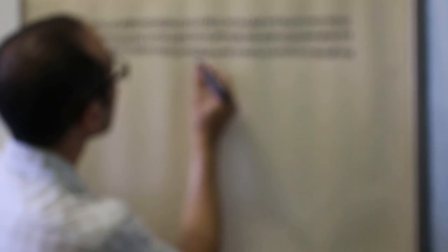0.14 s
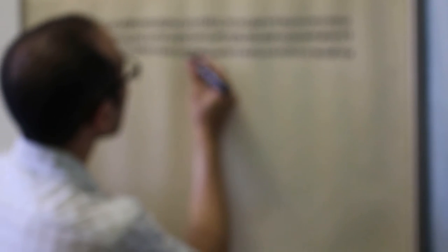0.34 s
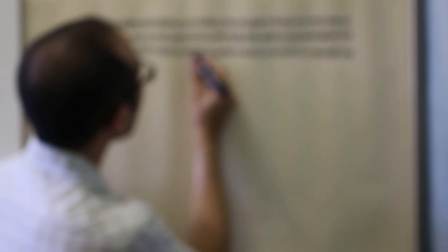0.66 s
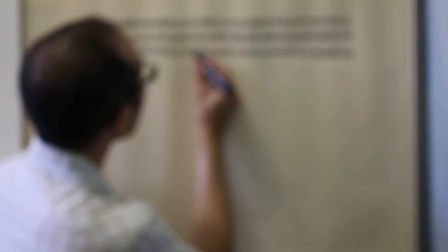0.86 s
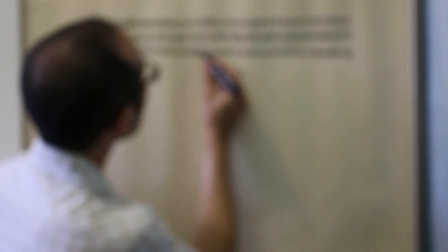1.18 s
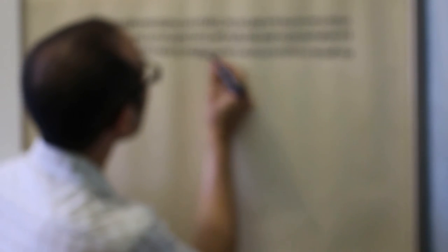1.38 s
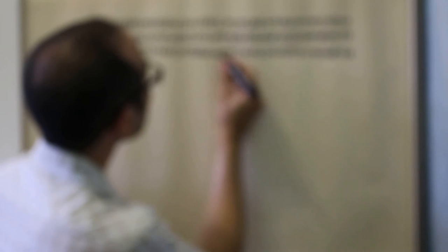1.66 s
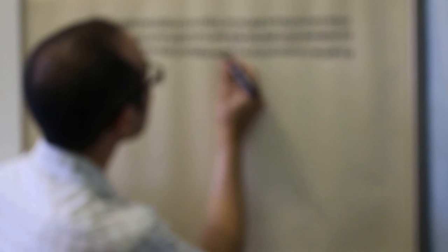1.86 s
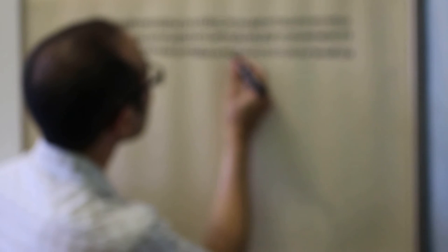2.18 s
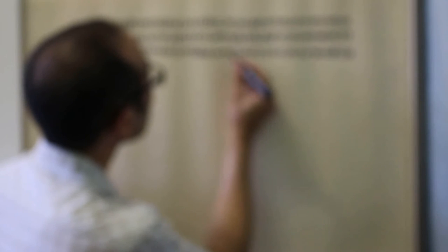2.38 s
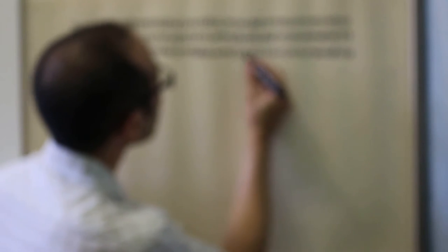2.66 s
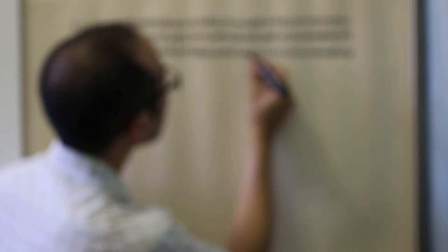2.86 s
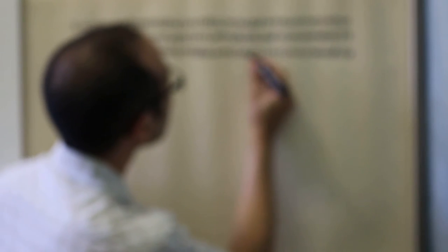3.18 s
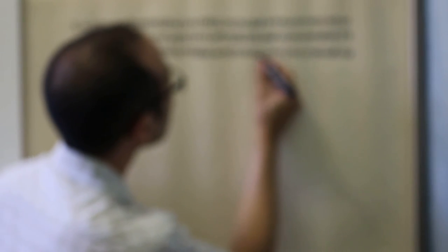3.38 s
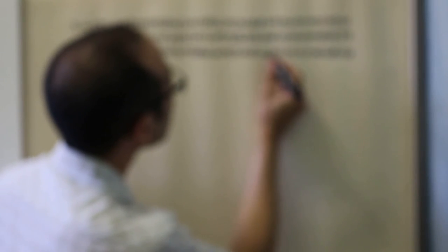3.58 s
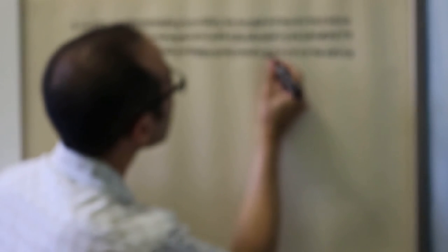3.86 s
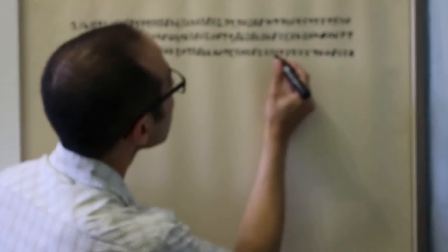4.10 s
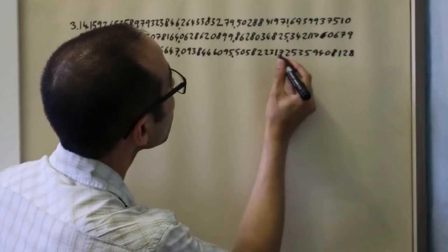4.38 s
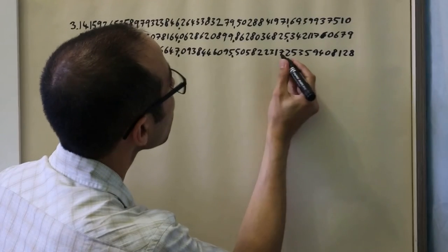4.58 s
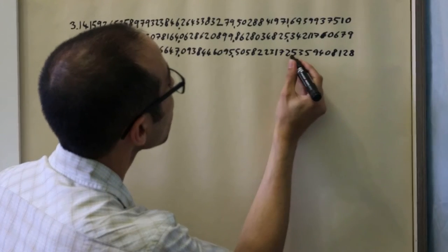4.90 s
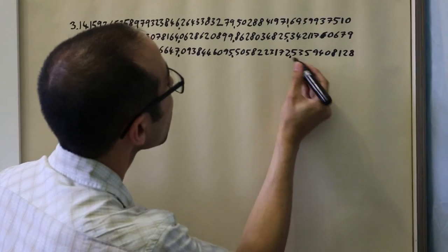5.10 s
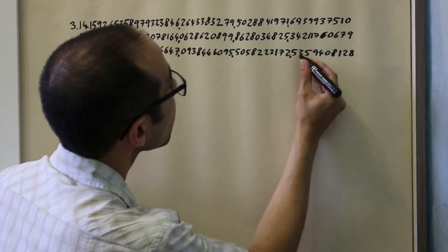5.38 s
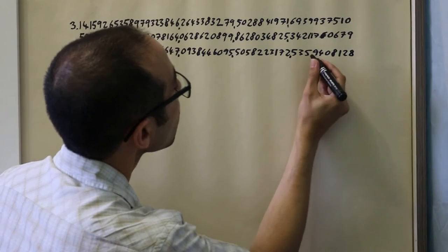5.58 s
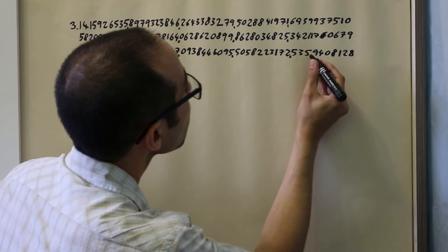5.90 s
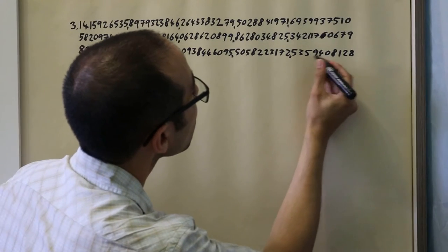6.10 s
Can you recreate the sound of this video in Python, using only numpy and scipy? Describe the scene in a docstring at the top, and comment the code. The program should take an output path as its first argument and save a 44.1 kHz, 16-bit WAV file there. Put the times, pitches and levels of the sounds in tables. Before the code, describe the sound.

Close, irregular marker strokes hiss and scratch on a loose wall panel, each touch a click with a soft hollow thump, indoors.

```python
"""In a quiet room, a felt-tip marker writes digits on a large wall board.
Touches and soft knocks ring the pen's barrel and send a dispersive bending wave through the panel:
a tick, then a low thud; the loose panel knocks back on its frame and swings slowly.
Friction noise makes the felt hiss and sometimes rasp along each stroke, and the hand and sleeve rub;
filtered noise and a few wavering tones make the ventilation's rumble."""
import sys
import numpy as np
from scipy import signal
from scipy.fft import rfft, irfft, next_fast_len
from scipy.io import wavfile

SR = 44100
rng = np.random.default_rng(int(sys.argv[2]) if len(sys.argv) > 2 else 0)


def unload_audio(sound):
    """Save the sound as a 16-bit wav file, at the path given as the first command line argument."""
    columns = np.transpose(np.atleast_2d(sound))
    # keep every value between -1 and 1, then stretch to whole-number steps
    steps = np.round(np.clip(columns, -1, 1) * 32767)
    wavfile.write(sys.argv[1], SR, steps.astype(np.int16))


N = 275163

# Touches and soft knocks on the panel, faint to firm: (time [s], relative barrel click [dB],
# relative hard clack [dB], relative thud [dB], knock-back relative to the thud [dB])
TOUCHES = [(0.0235, -37, -49.5, -20.5, -20), (0.2436, -34.5, -39.5, -18, -19), (0.297, -52, -46, -35, -11),
           (0.5058, -35, -55, -14.5, -13), (0.7572, -41, -51, -23.5, -25), (0.9391, -48, -50, -41, 6),
           (1.2596, -44, -44.5, -20, -4.5), (1.6532, -58, -53, -30, -9), (1.911, -38.5, -48, -21, 0),
           (2.14, -56, -45, -20, -30), (2.352, -31, -64, -16, -2.5), (2.4545, -47, -62, -30, -17),
           (2.5, -23.5, -23, -10, -15), (2.5275, -27.5, -32, -11.5, -20), (2.5537, -37, -38.5, -45, -16),
           (2.5682, -50, -59, -13.5, -6.5), (2.7006, -39, -51, -29, -17), (2.797, -43, -46, -23.5, -14),
           (3.0456, -32, -47, -17, -22), (3.311, -43, -33.5, -16, -22), (3.4223, -62, -68, -26, -17),
           (3.5296, -32, -43, -19, -13), (3.5863, -34, -47, -22, -18), (3.7058, -64, -54, -47, -12),
           (3.9699, -38.5, -41, -22, -30), (4.144, -53, -48, -27, -21), (4.3584, -38, -44.5, -26.5, -16),
           (5.0359, -30, -38, -15, -4), (5.2004, -25, -22.5, -10.5, -11), (5.24, -42, -29, -11.5, -23),
           (5.2526, -35, -39, -26, -11), (5.6352, -61, -73, -30.5, -25), (5.7941, -38.5, -42.5, -26, -12),
           (5.819, -33, -46, -27.5, -11), (5.8421, -47, -49, -22, -21), (5.9487, -49, -47, -29.5, -18),
           (6.0307, -44, -46, -27, -12), (6.2014, -21, -23, -11.5, -13), (6.231, -55, -55, -14, -15)]
BEND_DELAY_S = 0.01205   # travel time of a 100 Hz bending wave
RING_SIZE = 2 ** 15   # longest single event [samples]


def from_db(db):
    """Amplitude gain is ten to the power of the level over 20."""
    return 10 ** (np.asarray(db) / 20)


def rms_one(x):
    """Normalise to unit mean-square power."""
    return x / np.sqrt(np.mean(x ** 2) + 1e-20)


def in_time(rows):
    """Interpolate each column linearly in time, sample by sample."""
    s, *columns = np.transpose(rows)
    return [np.interp(np.arange(N) / SR, s, column) for column in columns]


def at_hz(points, hz):
    """Interpolate a table on a logarithmic frequency axis."""
    known_hz, values = np.transpose(points)
    return np.interp(np.log(np.maximum(hz, 1)), np.log(known_hz), values)


def coloured(x, spectrum):
    """Spectral shaping: multiply the spectrum by a gain curve, then normalise to unit power."""
    size = next_fast_len(len(x))
    hz = np.arange(size // 2 + 1) * SR / size
    shaped = rfft(x, size) * from_db(at_hz(spectrum, hz))
    return rms_one(irfft(shaped, size)[:len(x)])


def drift(rate, size=N):
    """Slow random modulation: straight lines join normal random values, `rate` of them a second."""
    knots = rng.standard_normal(size // 8)
    return np.interp(np.arange(size) / SR * rate, np.arange(len(knots)), knots)


def add(track, sound, s):
    """Superposition: mix a sound into the track from time s."""
    at = int(np.clip(round(s * SR), 0, N - 1))
    track[at:at + len(sound)] += sound[:N - at]


def slips(spectrum, grain_db, flutter_db, flutter_rate, size=N):
    """Stick-slip friction: countless tiny catches and slips, fluttering with the pressure; unit power."""
    grain = grain_db * drift(2500, size)
    flutter = flutter_db * drift(flutter_rate, size)
    return coloured(rng.standard_normal(size) * from_db(grain + flutter), spectrum)


def swells(rows):
    """Friction follows sliding speed: each short slide speeds up and slows down again."""
    out = np.zeros(N)
    for s, length, db in rows:
        add(out, from_db(db) * signal.windows.tukey(int(length * SR), .8), s)
    return out


def ventilation(air_db):
    """Broadband flow noise: a steady rush of air with a few randomly modulated tones."""
    # Air colour: (frequency [Hz], relative spectral level [dB])
    air_colour = [(10, -19), (22, 1), (40, -11), (58, 0), (98, -9.5), (171, -8), (300, -24), (534, -29),
                  (800, -28), (1340, -34), (2500, -38), (9000, -38.5), (13000, -40), (15700, -41)]
    # Tones: (frequency [Hz], width [Hz], level [dB])
    tones = [(49.4, 2.31, -39.5), (348, 12, -56), (374.5, 4.1, -63), (648, 8.5, -63.5), (720, 4.6, -69)]
    t = np.arange(N) / SR
    out = from_db(air_db) * coloured(rng.standard_normal(N), air_colour)
    for hz, width, db in tones:
        # complex modulation wavers both strength and phase
        waver = 1 + (drift(2 * width) + 1j * drift(2 * width)) / 2
        out += from_db(db) * rms_one(np.real(waver * np.exp(2j * np.pi * hz * t)))
    return out


def hand(rub_db, sleeve_db, skid_db):
    """Sliding friction: skin drags unevenly over the panel and now and then skids; the sleeve follows."""
    # Arm moving along the panel: (time [s], relative hand rub [dB], relative sleeve rustle [dB])
    arm_levels = [(0.0, -49.5, -54.5), (0.4, -52, -53), (0.64, -51, -58.5), (0.94, -54, -56),
                  (1.34, -53.5, -55.5), (1.75, -53.5, -57), (2.38, -52.5, -54.5), (2.59, -51, -57.5),
                  (2.88, -51.5, -56.5), (3.35, -57, -62), (3.93, -52, -57.5), (4.38, -60, -62),
                  (5.07, -55, -62), (5.21, -54.5, -56), (5.53, -51, -54.5), (6.24, -52, -53)]
    # Side of the hand skidding to a new place: (time [s], length [s], relative level [dB],
    # pitch relative to the skid colour [ratio])
    skid_events = [(0.168, 0.14, -38.5, 1.06), (0.659, 0.12, -44.5, 1.06), (2.139, 0.076, -42, 1.0),
                   (2.938, 0.051, -46, 1.1), (3.579, 0.15, -44, 0.91)]
    # Colours of rub, skid and sleeve: (frequency [Hz], relative spectral level [dB])
    rub_colour = [(60, 13.5), (130, 10), (250, 4), (430, 4.5), (550, 0.5), (670, -2), (800, -3),
                  (1200, -8.5), (2500, -17.5), (9000, -60)]
    skid_colour = [(150, -26), (300, -0.5), (380, 6), (500, -3.5), (620, -13.5), (1000, -23), (2000, -56)]
    sleeve_colour = [(400, -39), (1200, -2.5), (2000, 0), (3200, -3), (5000, -11), (9000, -3), (15500, -17)]
    # level changes are stretched about the reference, so rubbing falls away faster as the arm comes to rest
    reference_db, contrast = -52, 1.78
    rub, sleeve = [from_db(reference_db + contrast * (db - reference_db)) for db in in_time(arm_levels)]

    out = from_db(rub_db) * rub * slips(rub_colour, grain_db=0.5, flutter_db=3.0, flutter_rate=86)
    for s, length, db, pitch in skid_events:
        colour = [(hz * pitch, level) for hz, level in skid_colour]
        skid = slips(colour, grain_db=2.5, flutter_db=1.5, flutter_rate=140, size=RING_SIZE)
        add(out, swells([(0, length, db + skid_db)])[:RING_SIZE] * skid, s)
    rustle = slips(sleeve_colour, grain_db=3.0, flutter_db=1.5, flutter_rate=220)
    return out + from_db(sleeve_db) * sleeve * rustle


def bending_wave(spectrum):
    """Dispersion: bending waves travel as the root of frequency, so a tap is a falling chirp; peak 1."""
    hz = np.arange(RING_SIZE // 2 + 1) * SR / RING_SIZE
    # this phase delays each frequency by BEND_DELAY_S * sqrt(100 / hz)
    phase = 4 * np.pi * BEND_DELAY_S * np.sqrt(100 * hz)
    wave = irfft(from_db(at_hz(spectrum, hz)) * np.exp(-1j * phase))
    return wave / np.abs(wave).max() * (np.arange(RING_SIZE) < RING_SIZE // 8)


def ringing(modes, spread_db, count):
    """Modal decay: modes start as the bending wave reaches them, with strengths that vary by touch."""
    hz, db, t60 = np.transpose(modes)[:, :, None]
    arrival = BEND_DELAY_S * np.sqrt(100 / hz)
    age = np.maximum(np.arange(RING_SIZE) / SR - arrival, 0)
    strengths = from_db(spread_db * rng.standard_normal((count, len(modes))))
    return strengths @ (from_db(db - 60 * age / t60) * np.sin(2 * np.pi * hz * age))


def scatter(count, build_s):
    """Reverberation: frame and wall reflections, new for each touch, die band by band; unit energy."""
    # Decay of scattered waves in panel and room: (frequency [Hz], t60 [s])
    decay_times = [(40, 0.26), (130, 0.24), (350, .22), (800, 0.12), (2000, 0.095), (5000, .13)]
    t = np.arange(RING_SIZE // 2) / SR
    edges_hz = np.geomspace(25, 12800, 10)
    white, out = rng.standard_normal((count, len(t))), 0
    for low, high in zip(edges_hz, edges_hz[1:]):
        band_filter = signal.butter(2, [low, high], "band", fs=SR, output="sos")
        t60 = at_hz(decay_times, np.sqrt(low * high))
        out = out + signal.sosfilt(band_filter, white) * from_db(-60 * t / t60)
        white = white[:, ::-1]   # reversed noise for the next band
    out = out * (1 - np.exp(-t / build_s))
    return out / np.sqrt(np.sum(out ** 2, axis=1, keepdims=True))


def chatter(length_s, share):
    """Repeated impact: a first contact, then a decaying cluster of tiny ones; unit energy."""
    t = np.arange(RING_SIZE // 64) / SR
    contacts = rng.standard_normal(len(t)) * np.exp(-t / length_s)
    contacts *= share / np.linalg.norm(contacts)
    contacts[0] += 1
    return contacts / np.linalg.norm(contacts)


def taps(thud_db, clack_db, barrel_db, knock_db, thud_scatter_db, tick_scatter_db, knock_scatter_db, lead_s):
    """Impact excitation: each touch sends chirps, rings pen and panel, scatters, and is knocked back."""
    # Colours of thud, clack and mid-range knock: (frequency [Hz], relative spectral level [dB])
    thud_colour = [(18, -16), (45, -9), (72, -4), (110, 3), (170, -4), (250, -11.5), (380, -19),
                   (500, -25.5), (800, -38.5), (1300, -47), (2500, -89)]
    clack_colour = [(300, 1), (700, 2), (1100, 4.5), (1600, 1.5), (2400, 5), (3200, -7), (4100, -10),
                    (5000, -27), (8000, -39), (15000, -47)]
    knock_colour = [(120, -28), (240, 1), (340, 5.5), (460, -1), (620, -3), (900, -9), (1500, -40),
                    (4000, -62)]
    # Panel and pen barrel modes: (frequency [Hz], relative level [dB], t60 [s])
    panel_modes = [(48, -13.5, 0.31), (95.5, -13, 0.2), (135.1, -12, 0.3), (163, -27, 0.54),
                   (199.1, -26.5, 0.54), (247.5, -28.5, 0.42), (307.2, -25.5, 0.15), (364, -25.5, 0.17),
                   (481, -33, 0.15), (584, -42, 0.21)]
    barrel_modes = [(2470, -12, 0.022), (2784, 6, 0.0079), (2930, 2, 0.012), (3135, -4.5, 0.023),
                    (3710, -9.5, 0.021), (3840, -29, .016), (4580, -33, 0.014)]
    # A grazing touch: (relative barrel click [dB], relative hard clack [dB], relative thud [dB],
    # knock-back relative to the thud [dB])
    graze = (-62, -58, -37, -17)
    graze_count = 8   # faint extra touches at random times
    knock_back_s = .057   # the loose panel falls back on its frame this long after a touch

    touches = list(TOUCHES) + [(s, *graze) for s in rng.uniform(0, N / SR, graze_count)]
    count = len(touches)
    thud, clack, knock = bending_wave(thud_colour), bending_wave(clack_colour), bending_wave(knock_colour)
    panels = ringing(panel_modes, spread_db=4.0, count=count)
    barrels = ringing(barrel_modes, spread_db=1.5, count=count)
    tails = scatter(count, build_s=0.0031)
    out = np.zeros(N)
    for touch, panel, barrel, tail in zip(touches, panels, barrels, tails):
        s, pen_db, hard_db, push_db, back_db = touch
        start = s - lead_s
        push = from_db(push_db + thud_db)
        landing = signal.fftconvolve(clack, chatter(length_s=0.002, share=1.0))[:RING_SIZE]
        tick = from_db(hard_db + clack_db) * landing + from_db(pen_db + barrel_db) * barrel
        # a hard landing is brief, so it also wakes the panel's middle range
        middle = from_db(hard_db + knock_db) * knock
        scattered = from_db(thud_scatter_db) * push * thud
        scattered = scattered + from_db(tick_scatter_db) * tick
        scattered = scattered + from_db(knock_scatter_db) * middle
        # the panel is pushed away from the listener, so the pressure falls first
        body = -push * (thud + panel)
        add(out, body - middle - tick, start)
        add(out, from_db(back_db) * body, start + knock_back_s)
        add(out, signal.fftconvolve(scattered[:RING_SIZE // 8], tail), start)
    return out


def sway(sway_db):
    """Forced swing: each listed touch swells a low noise, louder after a heavy thud; powers add."""
    # Swing colour: (frequency [Hz], relative spectral level [dB])
    sway_colour = [(14, 8), (26, 18.5), (45, 18.5), (70, 8), (130, -37.5)]
    rise_s, decay_s = .03, .15
    follows = 0.61   # swing per thud level [dB per dB]
    t, power = np.arange(RING_SIZE) / SR, np.zeros(N)
    swing = (1 - np.exp(-t / rise_s)) * np.exp(-t / decay_s)
    for s, _, _, push_db, _ in TOUCHES:
        add(power, (from_db(follows * push_db + sway_db) * swing) ** 2, s)
    return np.sqrt(power) * coloured(rng.standard_normal(N), sway_colour)


def stroke_shape(length, swell_db):
    """Energy envelope: a stroke speeds up, swells or fades with pressure, stops, and lingers in the room."""
    attack_s, release_s = 0.028, 0.035   # the nib gathers speed, and slows to a stop
    linger_s, linger_share = 0.013, 0.083   # the room holds a share of the power for a moment
    t = np.arange(RING_SIZE // 2) / SR
    speed = np.clip(np.minimum(t / attack_s, (length - t) / release_s), 0, 1)
    pressure = from_db(swell_db * (np.minimum(t / length, 1) - .5))
    power = (np.sin(np.pi / 2 * speed) * pressure) ** 2
    hold = np.exp(-1 / (linger_s * SR))
    return np.sqrt(power + linger_share * signal.lfilter([1 - hold], [1, -hold], power))


def felt(nib_db, friction_db, rasp_db, flick_s):
    """Stick-slip friction: nib hiss over broad friction in each stroke, with dry rasps and quick flicks."""
    # Strokes: (time [s], length [s], relative nib hiss [dB], relative broad friction [dB],
    # swell from start to end [dB], brightness [dB per octave])
    strokes = [(0.044, .22, -52, -57.5, 3, 3), (0.24, 0.078, -47.5, -49, 1, -1),
               (0.288, 0.23, -55, -65, 5, -4), (0.444, 0.087, -46, -51, 8, -1),
               (0.507, 0.17, -55.5, -57, -2, 4), (0.787, 0.13, -59, -56.5, -1, 1),
               (0.865, 0.037, -47, -52, -3, 2), (1.09, .07, -47.5, -51, 1, -3),
               (1.135, 0.12, -39, -47.5, 5.5, 3), (1.376, 0.12, -46, -50.5, 5, 2),
               (1.593, 0.063, -38.5, -50, 8, 6), (1.644, .12, -42.5, -50, 0, 7),
               (1.901, 0.14, -52, -54.5, -8, -1), (2.005, 0.082, -44, -52.5, -1, 2),
               (2.066, 0.11, -43.5, -49.5, -3, -1), (2.34, 0.064, -39, -46, -2, -9),
               (2.396, .15, -39.5, -48.5, 10, 4), (2.527, 0.16, -47.5, -57, -18, -5),
               (2.649, 0.14, -44.5, -52.5, -4, -1), (2.794, 0.079, -43, -50.5, -3, 1),
               (3.227, .11, -37.5, -49, 8, -1), (3.363, 0.051, -45.5, -56, 10, -2),
               (3.526, 0.1, -44, -50, 7, -4), (3.965, 0.093, -46.5, -59, 3, -1),
               (4.003, 0.15, -42, -52, 0, 0), (4.405, 0.073, -50, -53, -5, -3),
               (4.638, .12, -38, -50, 3.5, -1.5), (4.786, .044, -44, -53.5, 5, 3),
               (5.02, 0.093, -44, -47, -5, -1), (5.105, .165, -42.5, -51.5, 6, -1),
               (5.242, 0.2, -41.5, -53, 1.5, 0), (5.51, 0.091, -41, -52, -2, 3),
               (5.683, 0.21, -53.5, -57, 8, 4), (5.854, 0.2, -54.5, -58.5, -10, 2),
               (6.069, .052, -41.5, -50, 1, 4), (6.099, .122, -37.5, -48.5, 16.5, 2)]
    # The nib drags dry and judders: (time [s], length [s], relative level [dB])
    rasp_events = [(1.1, 0.19, -61), (2.105, 0.065, -53), (2.338, 0.07, -42.5), (2.665, 0.14, -53),
                   (3.28, 0.058, -47), (5.04, 0.054, -45), (5.17, 0.047, -51)]
    # Sharp flicks as the felt catches: (time [s], relative level [dB])
    flick_events = [(.299, -38), (1.626, -49), (2.245, -51), (2.312, -45), (3.868, -49)]
    # Colours of nib, broad friction and rasp: (frequency [Hz], relative spectral level [dB])
    nib_colour = [(3000, -40), (5500, -13), (7000, -8), (8000, -5.5), (8900, -1), (9800, -1.5),
                  (10300, -2.5), (11000, -3), (11900, -8), (13000, -12.5), (15500, -20)]
    friction_colour = [(450, 14.5), (680, 8.5), (900, 5.5), (1300, 3.5), (2200, 7), (2700, 4.5), (3100, 6),
                       (4000, 1.5), (4400, 5), (4900, 1), (5800, 3), (7500, 4), (12500, -8.5),
                       (15500, -4.5)]
    rasp_colour = [(600, -3), (1200, -1), (1750, 11), (2300, -6), (2950, 4), (3500, -5), (4400, -28),
                   (9000, -32)]
    tilt_hz = 9500   # a stroke's brightness tilts the hiss above this frequency

    judder = slips(rasp_colour, grain_db=6.5, flutter_db=0.0, flutter_rate=430)
    out = from_db(rasp_db) * swells(rasp_events) * judder
    for s, length, hiss_db, broad_db, swell_db, bright_db in strokes:
        shape = stroke_shape(length, swell_db)
        size = len(shape)
        colour = [(hz, db + bright_db * max(np.log2(hz / tilt_hz), 0)) for hz, db in nib_colour]
        hiss = slips(colour, grain_db=1.2, flutter_db=1.1, flutter_rate=163, size=size)
        broad = slips(friction_colour, grain_db=2.5, flutter_db=1.2, flutter_rate=45.6, size=size)
        add(out, shape * (from_db(nib_db + hiss_db) * hiss + from_db(friction_db + broad_db) * broad), s)

    t, flicks = np.arange(N) / SR, np.zeros(N)
    for s, db in flick_events:
        flicks += from_db(db) * np.exp(-np.minimum(((t - s) / flick_s) ** 2, 20))
    nib_noise = coloured(rng.standard_normal(N), nib_colour)
    broad_noise = coloured(rng.standard_normal(N), friction_colour)
    return out + flicks * (nib_noise + broad_noise / 2)


def scene():
    """Linear superposition of writing sounds and ventilation, in one channel."""
    air = ventilation(air_db=-43.5)
    rubbing = hand(rub_db=8, sleeve_db=0, skid_db=2)
    knocks = taps(thud_db=2.5, clack_db=7.0, barrel_db=-4.5, knock_db=1.0, thud_scatter_db=-8.5,
                  tick_scatter_db=-8.5, knock_scatter_db=4.0, lead_s=0.00089)
    swinging = sway(sway_db=-16.5)
    strokes = felt(nib_db=0.0, friction_db=4.5, rasp_db=-0.5, flick_s=0.0015)
    return (air + rubbing + knocks + swinging + strokes)[None]


def record(dry):
    """Band limiting: a steep elliptic low-pass cuts the top."""
    cutoff_hz = 15650
    low_pass = signal.ellip(12, .1, 90, cutoff_hz, fs=SR, output="sos")
    return signal.sosfilt(low_pass, dry)


dry = scene()
out = record(dry)
unload_audio(out)
```